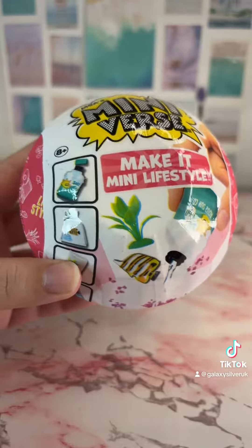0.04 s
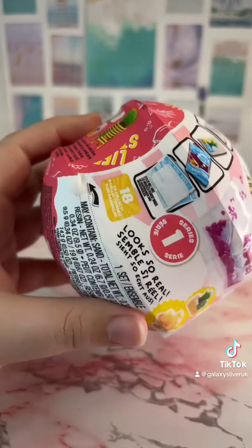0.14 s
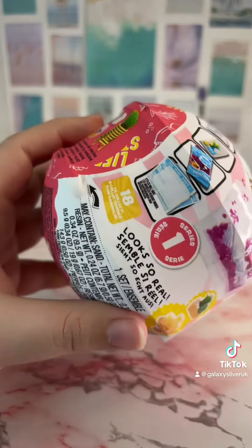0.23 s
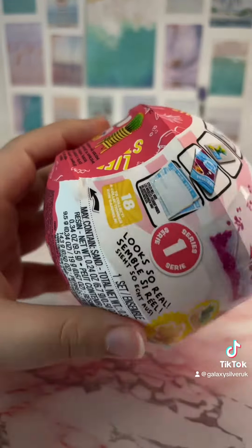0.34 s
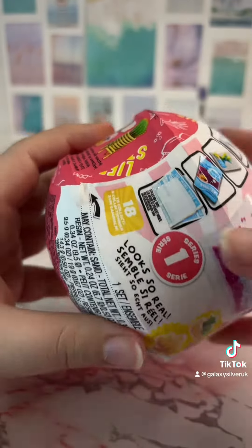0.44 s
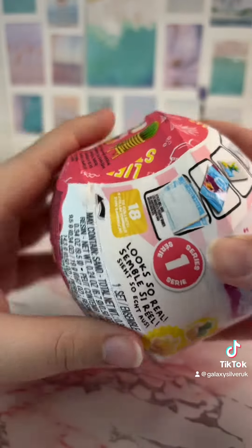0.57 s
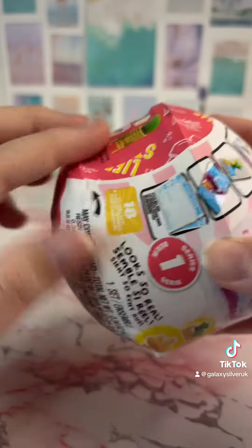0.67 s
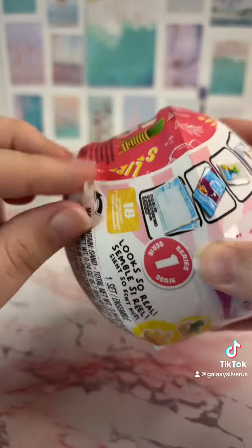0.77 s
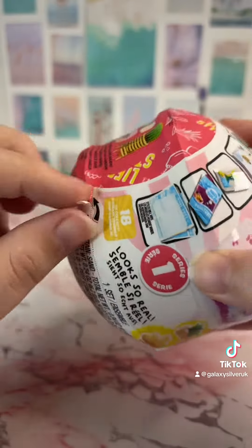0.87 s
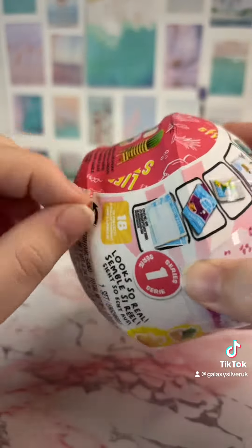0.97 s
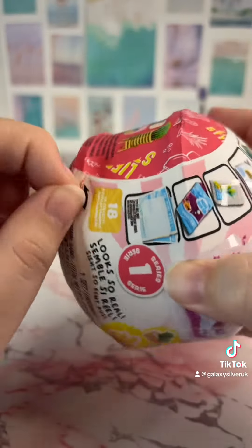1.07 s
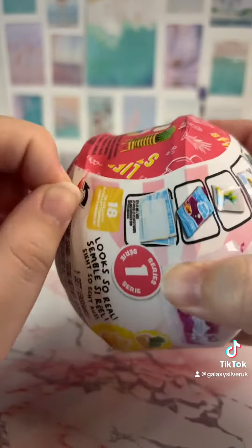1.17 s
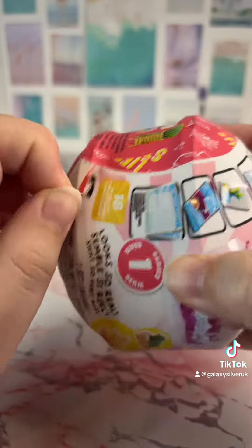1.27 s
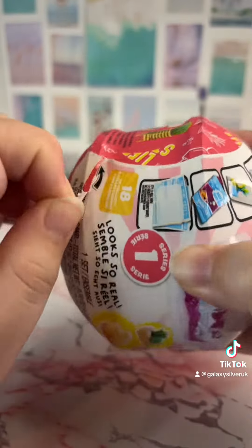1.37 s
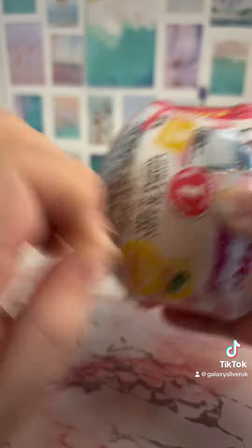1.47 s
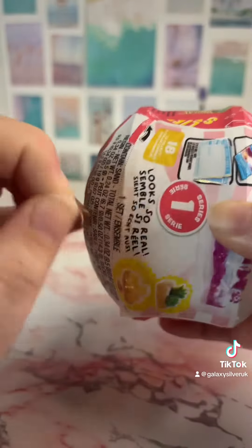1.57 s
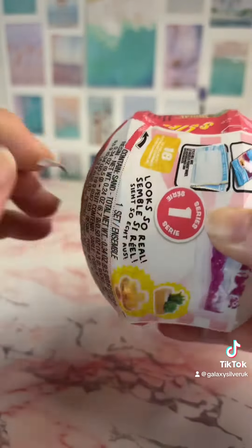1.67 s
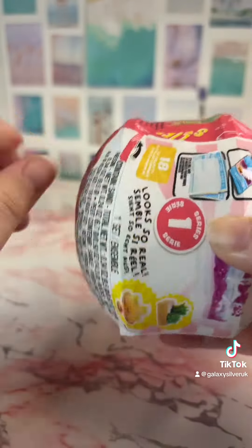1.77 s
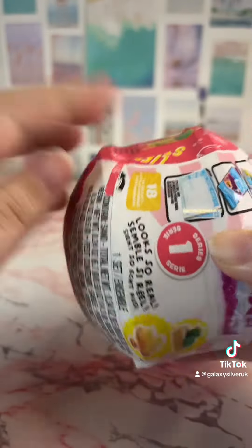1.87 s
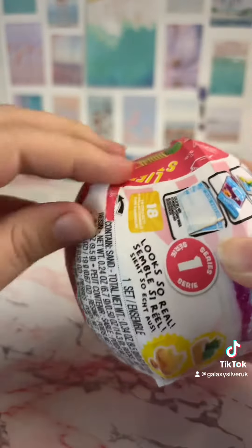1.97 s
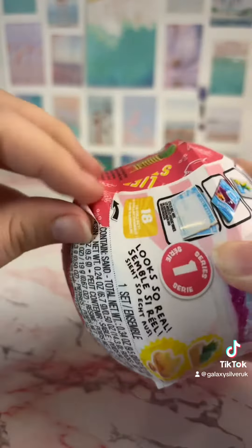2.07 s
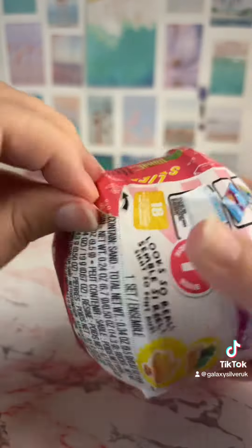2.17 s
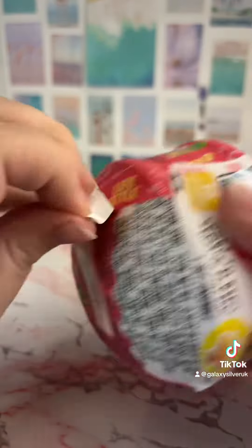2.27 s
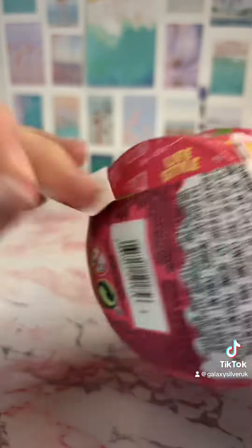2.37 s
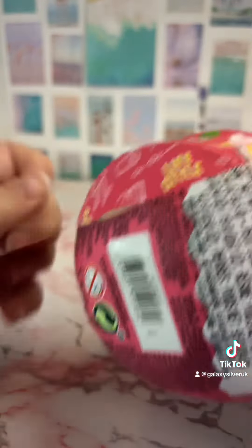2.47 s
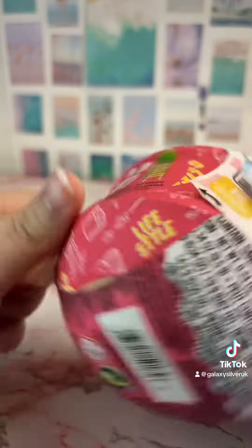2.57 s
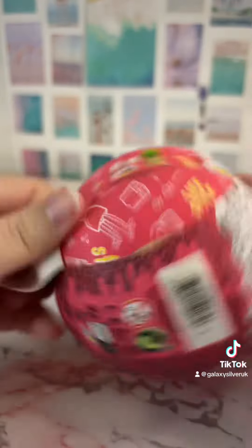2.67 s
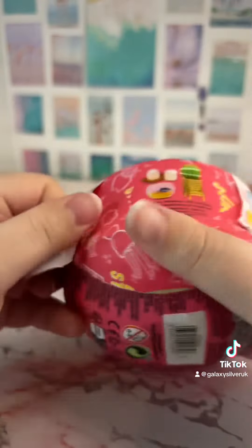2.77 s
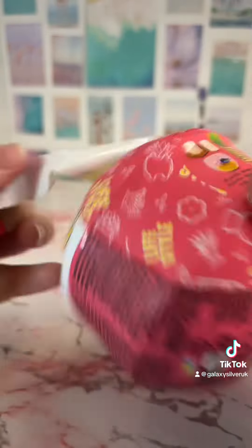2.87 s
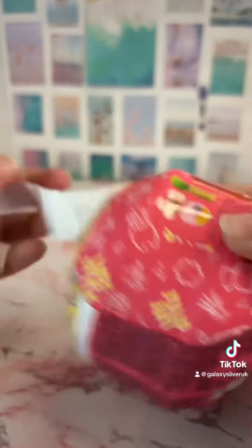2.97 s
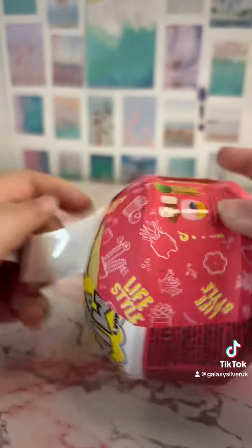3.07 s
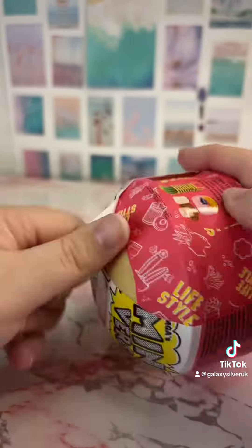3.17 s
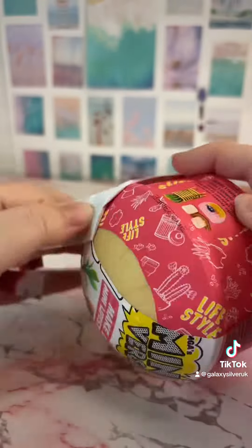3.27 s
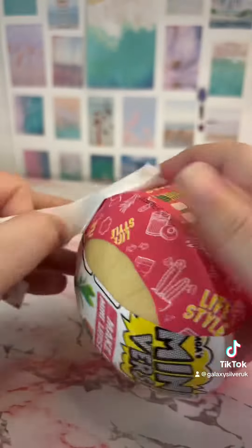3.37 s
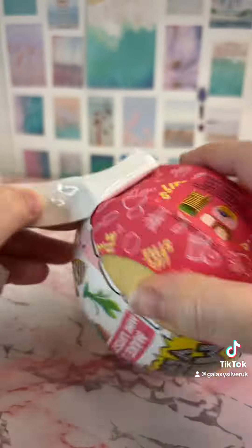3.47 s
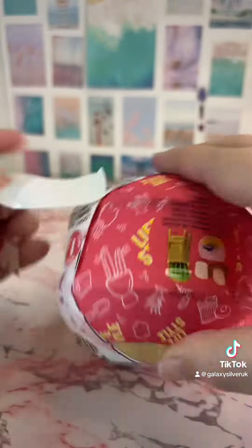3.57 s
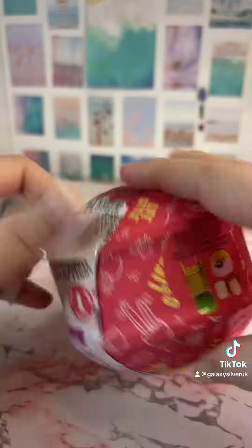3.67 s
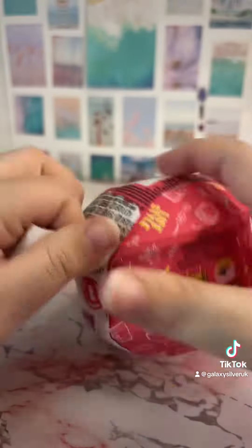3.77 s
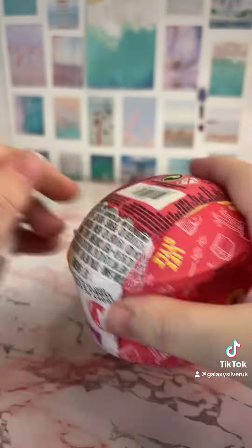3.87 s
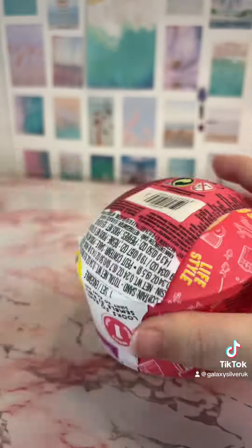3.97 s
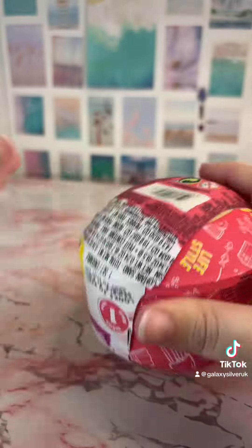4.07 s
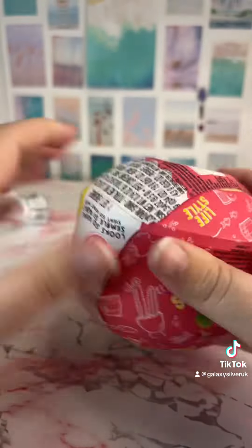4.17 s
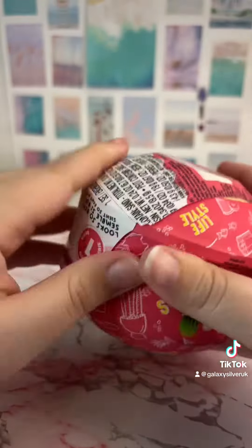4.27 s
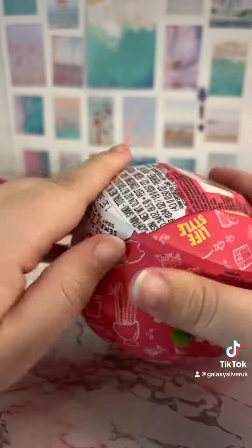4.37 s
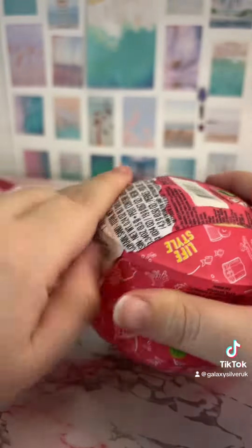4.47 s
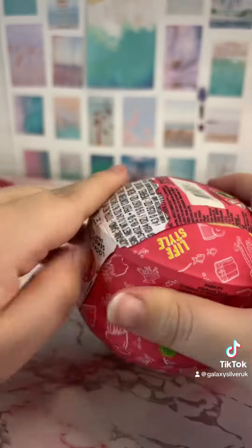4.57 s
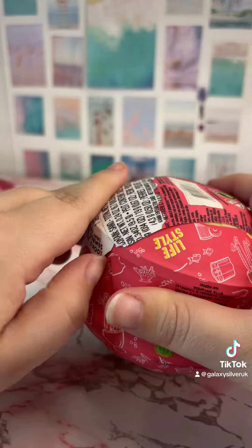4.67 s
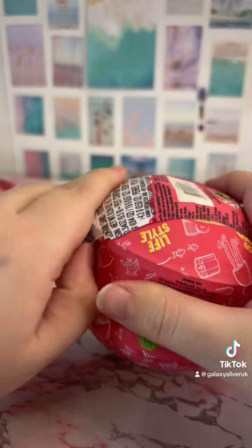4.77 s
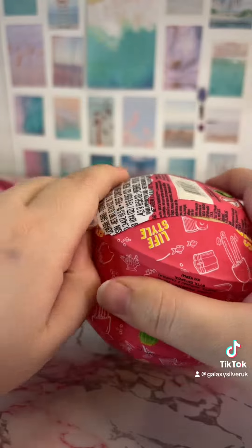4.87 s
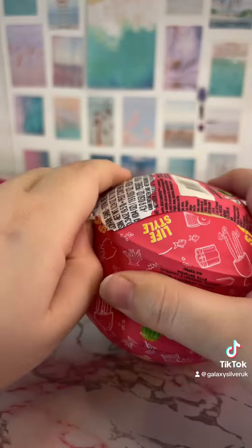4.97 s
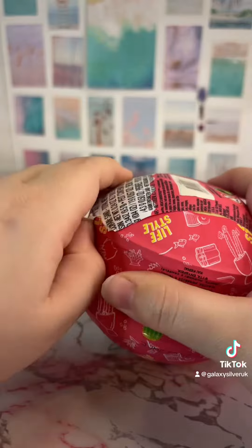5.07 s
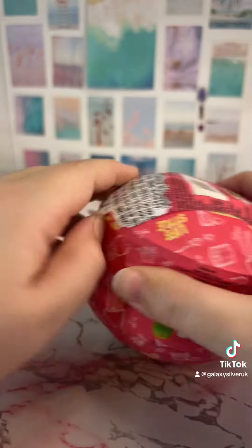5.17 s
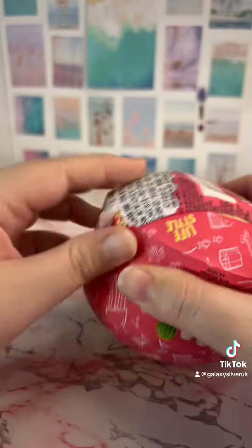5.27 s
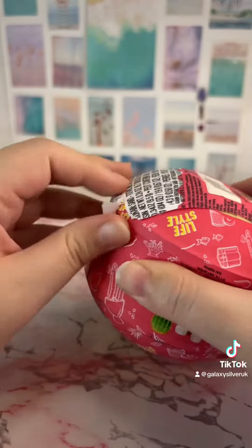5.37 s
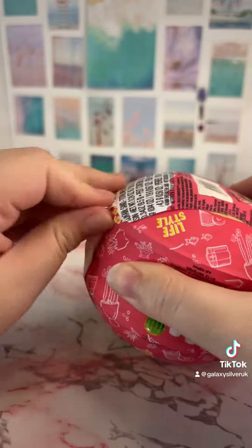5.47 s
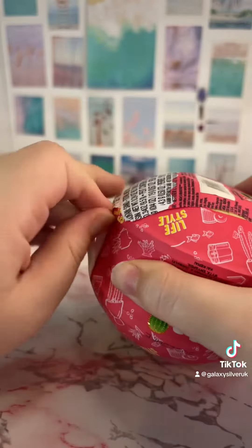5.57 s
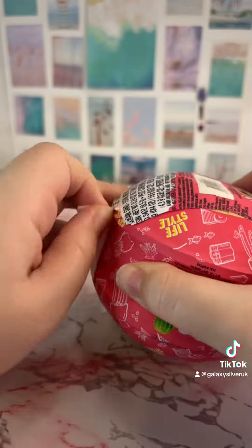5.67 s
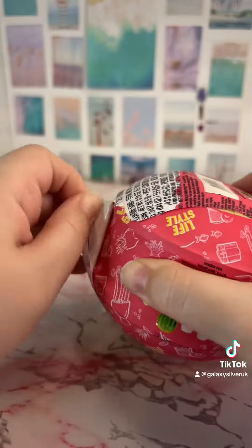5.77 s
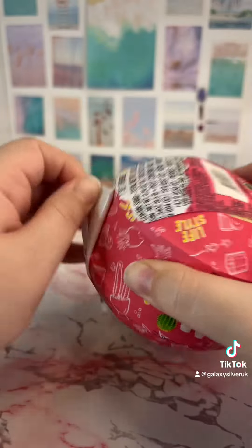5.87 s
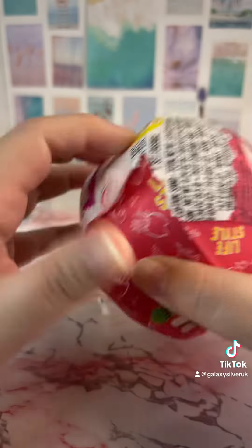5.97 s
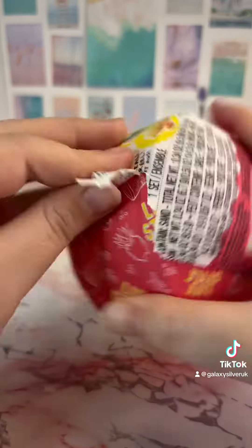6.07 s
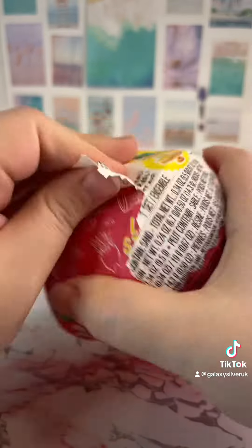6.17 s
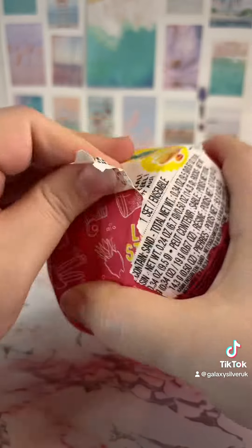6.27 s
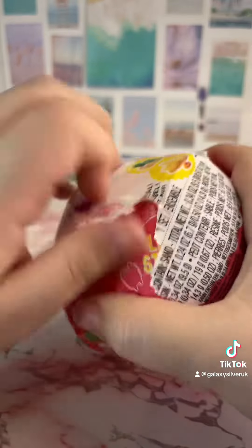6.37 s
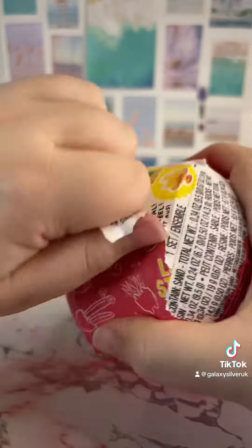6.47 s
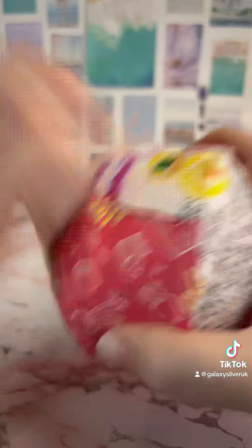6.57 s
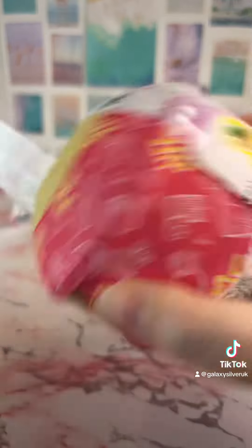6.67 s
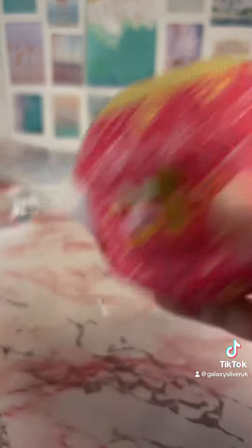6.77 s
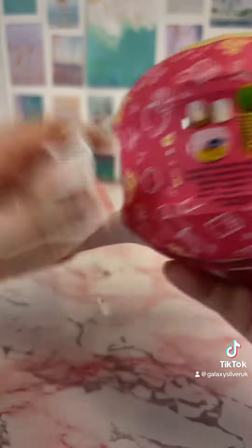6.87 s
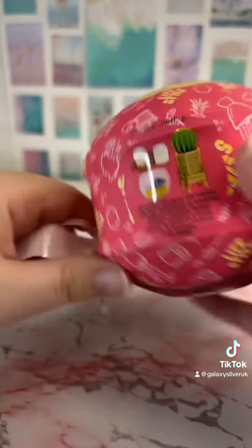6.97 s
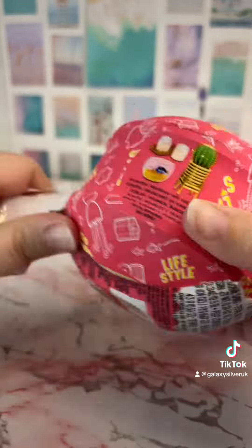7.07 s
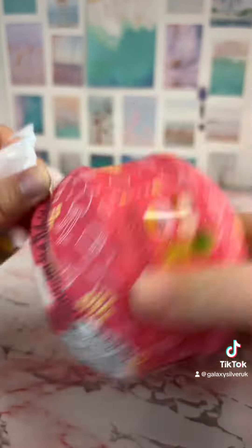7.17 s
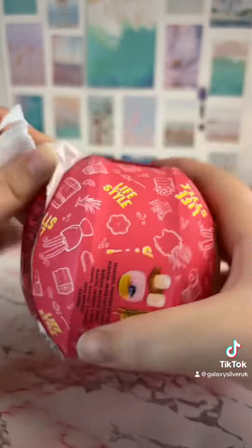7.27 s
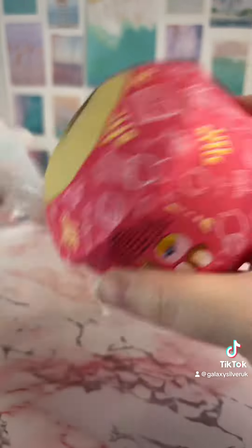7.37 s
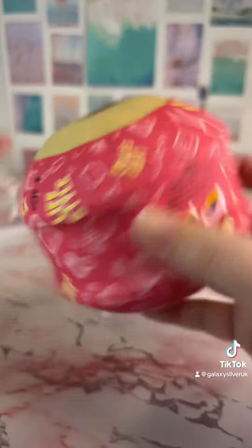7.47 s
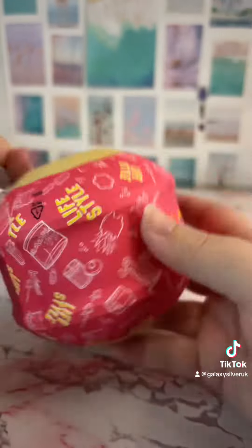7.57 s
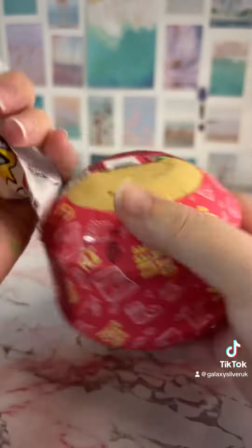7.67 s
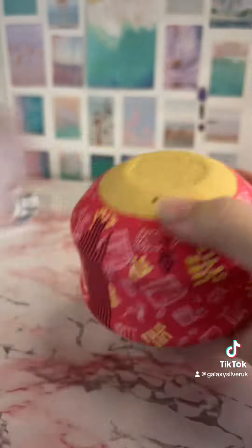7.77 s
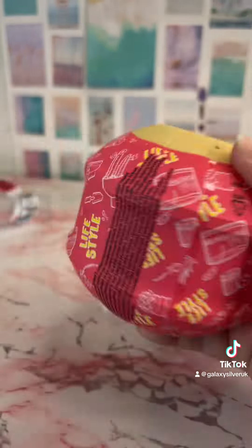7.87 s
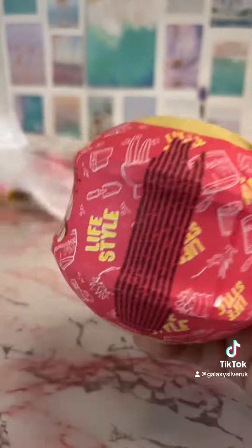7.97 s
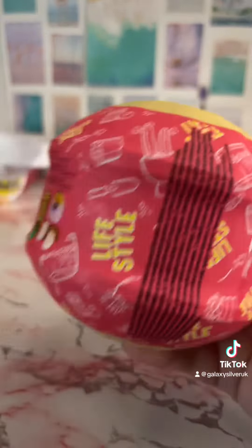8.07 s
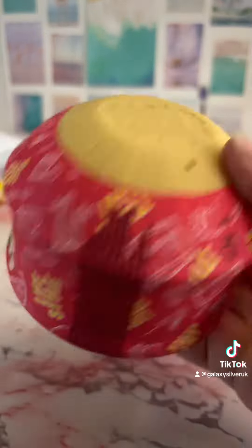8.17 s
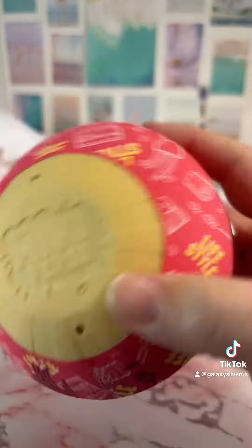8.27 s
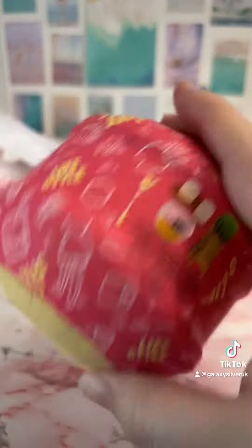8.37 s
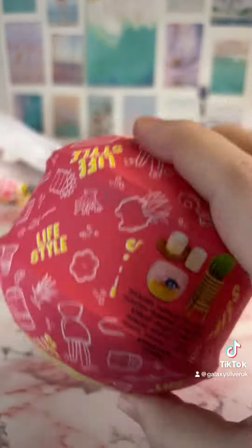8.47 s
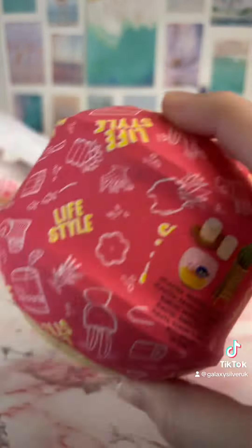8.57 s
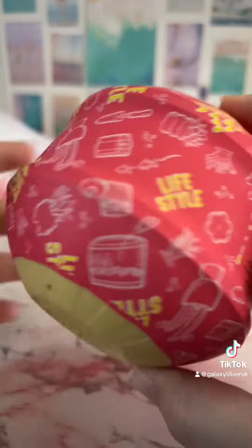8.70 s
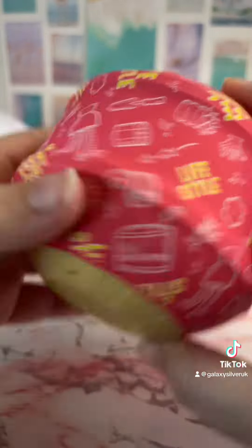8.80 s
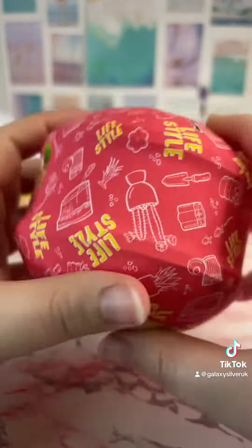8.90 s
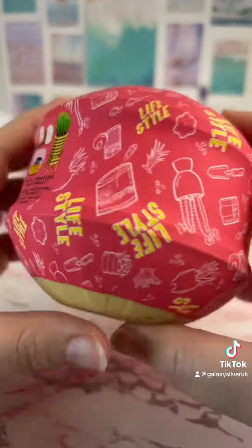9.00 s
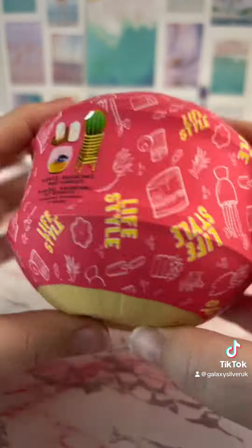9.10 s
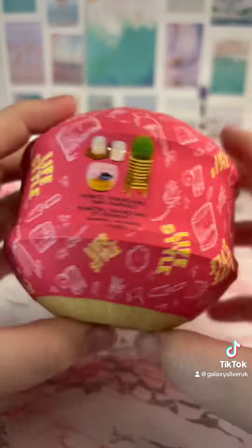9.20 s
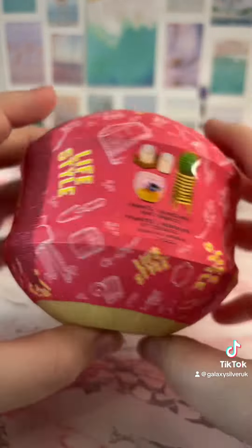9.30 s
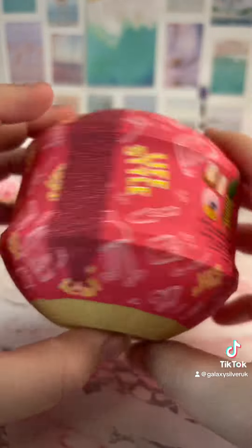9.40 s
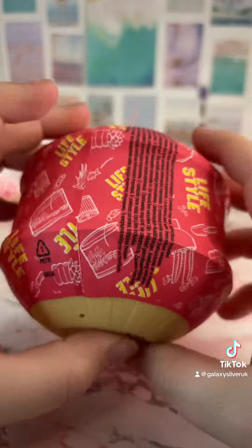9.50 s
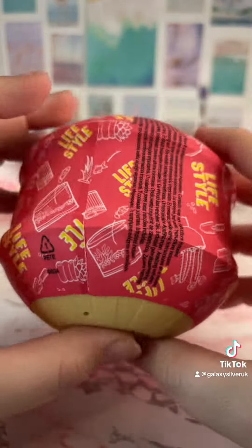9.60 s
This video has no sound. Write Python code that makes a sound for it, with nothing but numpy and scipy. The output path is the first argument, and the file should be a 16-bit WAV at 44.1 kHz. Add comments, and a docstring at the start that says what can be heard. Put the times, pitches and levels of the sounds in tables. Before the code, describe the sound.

A close, dry take of shrink film being torn from a hollow plastic ball, over a faint low room hush. Sound drops out completely for a moment just after the start, then hush and tiny ticks until a sharp crease snap at 0.8 s. From 1.0 to 1.5 s bright, brittle snaps cluster tightly, then stop. Faint crackles grow from 2.0 s; between 2.4 and 4.1 s rips, rustle and hard snaps come thickly. It quiets, with a dull hollow knock near 4.45 s, small tears around 4.8-5.0 s and one strong snap at 5.4 s. Sparse, light crinkling follows until 6.5 s. Then the loudest, densest tearing runs to about 7.9 s, with crisp pops, noisy zipping bursts, rubbing and low shell bumps. After 8.2 s only soft handling and faint ticks remain, fading towards hush by 9.6 s.

```python
"""Tearing film off a plastic ball

Two hands turn a hollow plastic ball and tear its shrink film off in strips, close by in a quiet room.
Creases snap: short ragged pushes set the film ringing. Perforations rip: bursts of tiny noisy slips.
The film rustles, hands rub the ball, and fingers bump the shell, which rings for a few cycles.
A short echo follows these sounds, over a steady hush; near the start all sound drops out for a moment."""
import sys
import numpy as np
from scipy import signal
from scipy.fft import rfft, irfft
from scipy.io import wavfile
from scipy.ndimage import uniform_filter1d

SR = 44100
rng = np.random.default_rng(int(sys.argv[2]) if len(sys.argv) > 2 else 0)


def unload_audio(sound):
    """Save the sound as a 16-bit wav file, at the path given as the first command line argument."""
    columns = np.transpose(np.atleast_2d(sound))
    # keep every value between -1 and 1, then stretch to whole-number steps
    steps = np.round(np.clip(columns, -1, 1) * 32767)
    wavfile.write(sys.argv[1], SR, steps.astype(np.int16))


N = 425124  # length in samples


def undb(db):
    """Turn decibels into a plain amplitude factor."""
    return 10 ** (np.asarray(db) / 20)


def level(x, db):
    """Scale a sound so that its average (RMS) level is db."""
    return x * undb(db) / np.sqrt(np.mean(x ** 2))


def ring(x, hz, width_hz):
    """Two-pole resonance: it rings at hz, with gain 1 there; a wider one dies away faster."""
    return signal.lfilter(*signal.iirpeak(hz, hz / width_hz, SR), x)


def add(out, s, sound):
    """Mix a short sound in at time s, in seconds."""
    i = int(s * SR)
    out[i:i + len(sound)] += sound[:N - i]


# Single creases flipping over, from loud snaps to faint ticks:
# (time [s], level [dB], ring of the crease's own patch [Hz])
CREASE_SNAPS = [(.535, -47, 5900), (.558, -57, 5900), (0.601, -43, 6000), (0.732, -38, 5700),
                (0.785, -11, 5670), (1.0436, -11.5, 6060), (1.1444, -9.5, 6300), (1.149, -18, 5640),
                (1.2136, -10.5, 5800), (1.2406, -9, 6550), (1.2462, -9.5, 6250), (1.2765, -5, 6340),
                (1.2871, -14, 5470), (1.2978, -10.5, 6340), (1.2987, -14, 6040), (1.3063, -11, 6340),
                (1.385, -15.5, 6300), (1.415, -11.5, 6350), (1.4526, -11, 5780), (1.5091, -32, 2000),
                (1.825, -36, 2600), (1.8908, -38.5, 6150), (2.0177, -28, 2260), (2.1697, -22.5, 6650),
                (2.2148, -15.5, 4400), (2.2338, -17, 5850), (2.242, -12.5, 6300), (2.2911, -21, 2270),
                (2.41, -11.5, 6900), (2.4481, -12, 2700), (2.5188, -23, 5500), (2.7294, -31.5, 2760),
                (2.7763, -11, 2660), (2.8067, -9.5, 5130), (2.8228, -6.5, 6060), (2.8282, -28, 5950),
                (2.8365, -11, 6840), (2.8448, -16, 6250), (2.8631, -7.5, 6430), (2.92, -15, 6300),
                (2.9704, -20, 5070), (3.072, -23.5, 6650), (3.0805, -19, 4650), (3.099, -23, 5600),
                (3.1424, -4.5, 5620), (3.2027, -6, 5560), (3.264, -15, 5870), (3.2942, -8, 5960),
                (3.529, -10, 5900), (3.586, -24, 4230), (3.623, -11, 4500), (3.7883, -11.5, 5800),
                (3.8422, -11, 4500), (3.9129, -11.5, 2360), (3.9926, -9, 2630), (4.0735, -14, 6300),
                (4.253, -60, 6200), (4.291, -37, 2810), (4.368, -32.5, 2600), (4.5115, -25, 2620),
                (4.735, -21, 5440), (4.8117, -12.5, 5600), (4.858, -21, 6140), (4.8616, -15, 4360),
                (4.9311, -15, 2840), (4.9876, -22.5, 3420), (5.137, -44, 2600), (5.1805, -22, 7740),
                (5.216, -29, 6160), (5.292, -43.5, 6160), (5.3439, -33, 1860), (5.4307, -7, 6170),
                (5.462, -21.5, 5150), (5.887, -30, 5700), (6.1261, -19.5, 2580), (6.198, -16.5, 7200),
                (6.5165, -19, 6180), (6.5597, -3.5, 6100), (6.578, -11, 2620), (6.6338, -10.5, 6330),
                (6.6795, -9, 6500), (6.6998, -11.5, 5530), (6.7771, -2.5, 6200), (6.9025, -15, 5400),
                (6.983, -12, 6180), (7.0304, -11, 2880), (7.0731, -24.5, 5500), (7.1775, -11.5, 5530),
                (7.2144, -8.5, 4800), (7.2559, -14.5, 6740), (7.2908, -7.5, 5730), (7.3028, -22, 4600),
                (7.317, -14, 5580), (7.382, -20, 4300), (7.3953, -6.5, 2450), (7.4394, -17, 5700),
                (7.4747, -10.5, 6800), (7.5277, -8.5, 2750), (7.593, -22.5, 5300), (7.678, -16.5, 4760),
                (7.6975, -15, 6430), (7.7372, -12, 5870), (7.7704, -28.5, 4260), (7.8091, -14, 6700),
                (7.845, -21, 2770), (7.897, -19, 5300), (7.907, -15.5, 5970), (7.935, -25, 4500),
                (8.0196, -29.5, 2530), (8.1938, -18, 6000), (8.29, -44, 4500), (8.393, -42, 2600),
                (8.462, -44.5, 4500), (8.52, -55.5, 4500), (8.6138, -48.5, 4500), (8.782, -43, 2430),
                (8.8232, -30, 2480), (8.9063, -46.5, 2600), (9.163, -43.5, 2600)]


def snaps():
    """Each crease gives a sharp, ragged push: its own patch rings, the whole film joins and shivers on."""
    out = np.zeros(N)
    t = np.arange(1024) / SR
    click = (t == 0) * 1.0
    film_answer = film(click, 0)
    noises = rng.standard_normal((len(CREASE_SNAPS), 1024))
    for (s, snap_db, hz), noise in zip(CREASE_SNAPS, noises):
        flip = np.exp(-t / 0.0006)  # the main push fades away in under a millisecond
        shiver = undb(-13) * np.exp(-t / 0.0048)
        push = noise * (flip + shiver) + 3.53 * click
        patch = ring(ring(push, hz, 840), hz, 1900)
        whole = signal.fftconvolve(push, film_answer)[:1024]
        # each part is set by its own peak, a little under the snap's level
        patch = undb(-4) * patch / np.abs(patch).max()
        whole = undb(-4.5) * whole / np.abs(whole).max()
        add(out, s, undb(snap_db) * (patch + whole))
    return out


# Bursts of tearing and peeling: (time of the peak [s], length between the points 13.9 dB down [ms],
# level [dB], boost of the low film modes on top of the common lift [dB])
TEAR_BURSTS = [(0.573, 88, -64, -9), (0.78, 28, -32.5, -12), (0.944, 17, -47.5, -3.5), (1.013, 18, -38, 3),
               (1.046, 71, -44, -4), (1.14, 30, -32, -13.5), (1.227, 63, -33, -10), (1.287, 83, -43, -2.5),
               (1.382, 25, -32.5, -13.5), (1.416, 45, -41.5, -15), (1.462, 55, -42, 3),
               (1.831, 31, -59, -8.5), (2.014, 22, -64.5, 20.5), (2.153, 32, -48.5, -4),
               (2.238, 76, -42, -6.5), (2.294, 12, -30, -8.5), (2.35, 11, -39, -2.5),
               (2.403, 58, -29, -0.5), (2.44, 63, -30.5, -7.5), (2.52, 40, -40, -19.5),
               (2.6, 110, -51.5, -15.5), (2.694, 36, -38.5, -4), (2.791, 100, -44, -5.5),
               (2.848, 74, -26.5, -3.5), (2.922, 31, -24, -10), (2.972, 15, -33, 2.5), (3.038, 28, -26, -8),
               (3.096, 50, -24, -23.5), (3.149, 53, -29.5, -13), (3.209, 32, -34.5, -24.5),
               (3.267, 25, -34, -5.5), (3.312, 52, -31.5, -7), (3.375, 32, -24, -5.5),
               (3.455, 17, -29, -7.5), (3.51, 75, -25, -7), (3.626, 28, -22, -8.5), (3.716, 29, -37, 1),
               (3.794, 74, -36.5, -3), (3.848, 34, -21, -8), (3.915, 50, -57.5, 1), (3.994, 38, -44.5, 1),
               (4.077, 56, -25.5, -7.5), (4.149, 87, -50, 0), (4.312, 45, -57, -5), (4.393, 32, -39, -3),
               (4.47, 56, -41.5, -10.5), (4.575, 58, -45.5, -16), (4.731, 18, -44.5, -11),
               (4.807, 20, -32, -15.5), (4.86, 37, -29, -7), (4.929, 28, -30.5, -2), (4.993, 28, -48, 11.5),
               (5.201, 40, -33.5, -9.5), (5.43, 90, -41.5, -8), (5.571, 43, -48, -7.5),
               (5.678, 33.7, -35, -10), (5.911, 75, -51, -7.5), (6.05, 69, -47.5, 5),
               (6.155, 94, -40.5, -16.5), (6.255, 30, -36.5, -34.5), (6.362, 35, -32.5, -10),
               (6.48, 97, -48.5, 7), (6.589, 70, -24.5, -4), (6.632, 27, -29.5, -16.5),
               (6.693, 40, -19, -16), (6.792, 113, -25, -7), (6.902, 15, -31.5, -2.5),
               (6.944, 24, -47, 9.5), (6.987, 28, -28, -11.5), (7.03, 10, -25.5, -18.5),
               (7.121, 25, -29, -7), (7.221, 86, -25, -13), (7.297, 8.3, -16.5, -15.5),
               (7.352, 105, -22, -4), (7.481, 41, -29, -4), (7.526, 34, -30, -11), (7.686, 60, -38, 0.5),
               (7.736, 24, -24.5, -9.5), (7.786, 25, -45.5, -2), (7.82, 46, -35, -15.5),
               (7.859, 52, -29, -13.5), (7.95, 51, -30, -1), (8.037, 70, -47, 3.5),
               (8.198, 36, -39.5, -2.5), (8.265, 52, -52.5, 0.5), (8.462, 17, -56.5, 7),
               (8.618, 13, -61, 6.5), (8.831, 47, -46, -2.5), (9.151, 70, -64, -2), (9.3, 21, -57, -5.5),
               (9.445, 45, -51, 2)]
RISE_SHARE = 0.48  # of a burst's length; the rest is its fall


def rips():
    """Dense crackle through the film swells and dies in dB; where bursts overlap, the louder colours more."""
    t = np.arange(N) / SR
    gain, weighted_low_db = np.zeros(N), np.zeros(N)
    for s, length_ms, peak_db, low_db in TEAR_BURSTS:
        near = slice(int((s - 0.2) * SR), int((s + 0.3) * SR))
        side = np.where(t[near] < s, -RISE_SHARE, 1 - RISE_SHARE)
        away = 1000 * (t[near] - s) / length_ms / side  # 0 at the peak, 1 at either end of the length
        shape = undb(peak_db - 13.9 * away ** 1.81)
        gain[near] += shape
        weighted_low_db[near] += shape * low_db
    grains = crackle(600, 5.5, 1.5, 3.5)
    low_boost_db = 5.85 + weighted_low_db / (gain + 1e-9)  # 5.85 dB is the common lift
    return gain * level(film(grains, low_boost_db), 0)


# Modes (ways of ringing) of film stretched on the ball:
# (pitch [Hz], width of the first of two resonances [Hz], relative level [dB])
FILM_MODES = [(386, 280, -12), (838, 300, -10), (1470, 1700, -13), (2600, 905, -2), (4500, 990, -1.5),
              (6070, 1340, -1.5), (7580, 2970, -7.5), (11010, 2000, -16.5), (13900, 1500, -14)]
LOW_MODES_HZ = 3500  # modes below this count as low


def film(push, low_db):
    """Push rings every mode, or one row rings each; low modes speak more when a wide patch moves."""
    rows = np.broadcast_to(push, (len(FILM_MODES), push.shape[-1]))
    total = 0
    for k, (hz, width_hz, mode_db) in enumerate(FILM_MODES):
        mode = ring(ring(rows[k], hz, width_hz), hz, 1.8 * width_hz)
        boost = undb(low_db) if hz < LOW_MODES_HZ else 1
        total = total + (-1) ** k * undb(mode_db) * mode * boost  # neighbours have opposite signs
    return total


def crackle(per_s, scatter_db, hiss_db, patchy_db=4.0):
    """Tiny slips of uneven size over a fine hiss: every slip drives each film mode differently."""
    hit = rng.random(N) < per_s / SR
    size = np.minimum(rng.exponential(size=N), 2.5)
    slip_s = 0.0009  # time for one slip to fade
    slips = signal.lfilter([1], [1, -np.exp(-1 / (slip_s * SR))], hit * undb(scatter_db * size))
    # the patch that moves changes every 30 ms or so, and each mode swells and fades alone
    step = 1300  # samples
    steps = np.repeat(rng.standard_normal((len(FILM_MODES), N // step + 1)), step, axis=1)
    patch = uniform_filter1d(steps, step // 2)[:, :N]
    strength = (level(slips, 0) + undb(hiss_db)) * undb(patchy_db * patch)
    return strength * rng.standard_normal((len(FILM_MODES), N))


# Fingers and table against the shell: (time, 3 ms after the start [s], level before the low cut [dB],
# ring of the shell [Hz])
SHELL_BUMPS = [(1.279, -45.5, 180), (1.452, -46.5, 114.4), (2.409, -34.5, 542), (2.446, -36, 492),
               (2.702, -47, 385), (2.773, -43, 113), (2.835, -41, 406), (2.919, -43.5, 177),
               (2.976, -37, 300), (3.146, -37.5, 350), (3.202, -46, 336), (3.48, -47, 310),
               (3.558, -48.5, 347), (3.779, -46.5, 122), (3.842, -42, 358), (4.446, -25.5, 331),
               (4.859, -36, 123), (4.93, -34, 180), (5.231, -45.5, 326), (5.343, -44, 128),
               (5.438, -38, 350), (6.055, -42, 118), (6.154, -44, 310), (6.587, -34, 433),
               (6.698, -38, 242), (6.775, -37, 513), (6.806, -41, 408), (7.342, -32, 399), (7.39, -36, 415)]


def bumps():
    """A soft blow some milliseconds long rings the hollow shell for a few cycles."""
    out = np.zeros(N)
    t = np.arange(4096) / SR
    soft_rise = (1 - np.exp(-t / 0.0042)) ** 2
    shape = soft_rise * np.exp(-t / 0.0065)  # both times in seconds
    noises = rng.standard_normal((len(SHELL_BUMPS), 4096))
    for (s, bump_db, hz), noise in zip(SHELL_BUMPS, noises):
        tone = np.sin(2 * np.pi * hz * t)
        rattle = level(ring(ring(noise, hz, 1.1 * hz), hz, 1.2 * hz), -4.5)
        add(out, s - 0.003, undb(bump_db) * (tone + rattle) * shape / shape.max())
    low_cut = signal.butter(2, 70, "high", fs=SR, output="sos")
    return signal.sosfilt(low_cut, out)


# Handling throughout, under and between the bursts, joined by straight lines in dB:
# (time [s], rustle level before wavering [dB], level of rubbing on the shell before wavering [dB])
HANDLING = [(.14, -85, -73.5), (1.329, -70, -70), (1.6, -89.5, -74), (2.2, -67, -68), (2.76, -51.5, -64),
            (3.0, -46, -57), (3.61, -54, -63), (4.002, -49, -69), (4.24, -67.5, -67), (4.9, -62, -63),
            (5.83, -75, -65.5), (6.38, -68, -65.5), (6.68, -53, -50.5), (7.101, -48, -80),
            (7.36, -45.5, -55), (7.7, -52, -68), (8.21, -71.5, -67.5), (9.64, -86.5, -75)]


def hands():
    """Faint soft rustle of the film and dull rubbing noise, both wavering as the grip shifts."""
    s, *columns = np.transpose(HANDLING)
    rustle_db, rub_db = (np.interp(np.arange(N) / SR, s, c) for c in columns)
    grip = level(ring(rng.standard_normal(N), 12.0, 10), 0)  # wavers around 12 times a second
    grains = crackle(50, 4, 2)
    rustle = level(film(grains, 0.98), 0) * undb(rustle_db + 4.64 * grip)
    rub = ring(rng.standard_normal(N), 140, 180) + 0.58 * ring(rng.standard_normal(N), 270, 160)
    return rustle + level(rub, 0) * undb(rub_db + 4.4 * grip)


# Colour of the quiet hush: (frequency [Hz], relative level per Hz [dB])
HUSH_COLOUR = [(12, -56.5), (20, -27.5), (127, -4), (158, -3), (193, -14.5), (262, -14), (446, -55.5),
               (499, -5.5), (542, -40), (698, -23.5), (16000, -43)]
HUSH_DB = -68  # average level of the hush


def room():
    """Steady hush of the room and the microphone: noise with each frequency set to its own strength."""
    hz, db = np.transpose(HUSH_COLOUR)
    f = np.maximum(np.arange(N // 2 + 1) * SR / N, 1)
    colour = undb(np.interp(np.log(f), np.log(hz), db))
    return level(irfft(rfft(rng.standard_normal(N)) * colour, N), HUSH_DB)


ECHO_T60_S, ECHO_DB = 0.15, -29.5  # time for the echo to fall 60 dB; its overall strength


def scene():
    """Film, ball and hands with their echo, over the hush; table and walls send back a diffuse tail."""
    near = snaps() + rips() + bumps() + hands()
    t = np.arange(8192) / SR
    tail = rng.standard_normal(len(t)) * undb(-60 * t / ECHO_T60_S) * (t > 0.002)
    tail = tail * undb(ECHO_DB) / np.sqrt(np.sum(tail ** 2))
    echo = signal.fftconvolve(near, tail)[:N]
    return (near + echo + room())[None]


DROPOUT_S = (0.053, 0.133)  # start and end of the silence, including 4 ms fades
TOP_HZ = 15900  # little is left above this


def record(dry):
    """The sound drops out for a moment near the start; a steep filter cuts the top."""
    a, b = DROPOUT_S
    gate = np.interp(np.arange(N) / SR, [a, a + 0.004, b - 0.004, b], [1, 0, 0, 1])
    top_cut = signal.ellip(10, 0.2, 80, TOP_HZ, fs=SR, output="sos")
    return signal.sosfilt(top_cut, dry * gate)


dry = scene()
out = record(dry)
unload_audio(out)
```